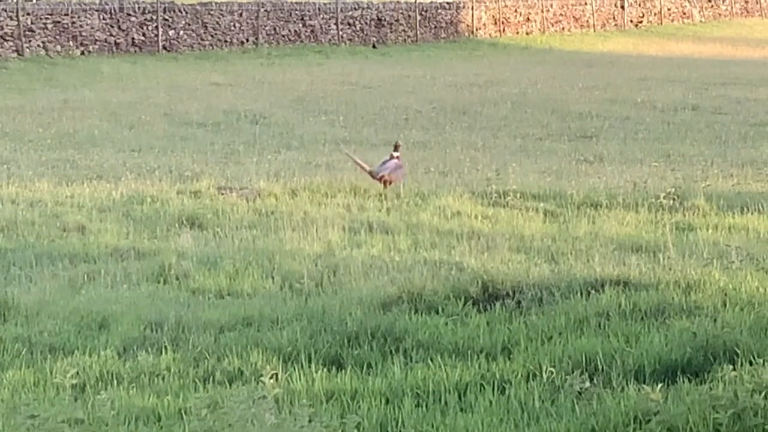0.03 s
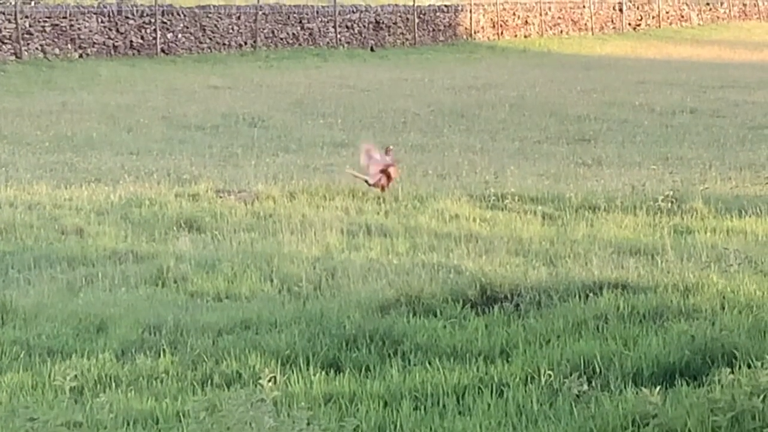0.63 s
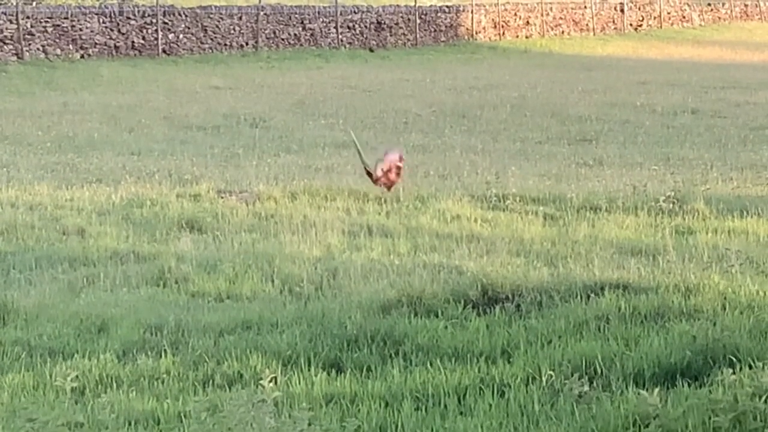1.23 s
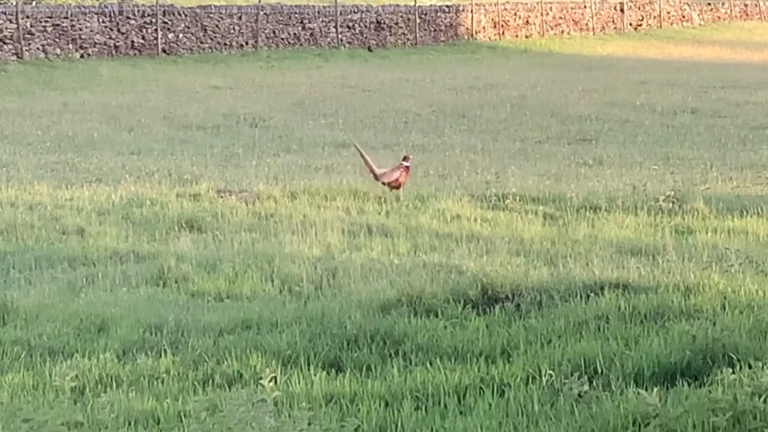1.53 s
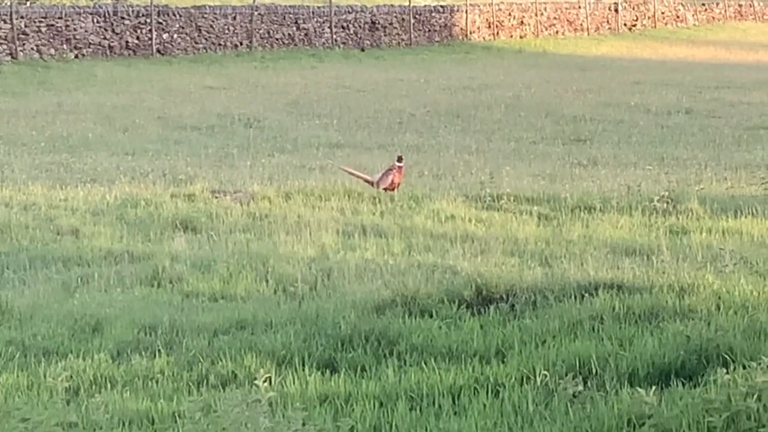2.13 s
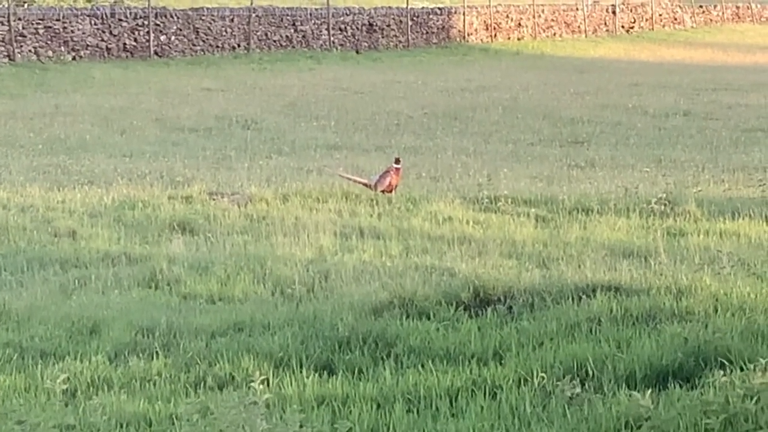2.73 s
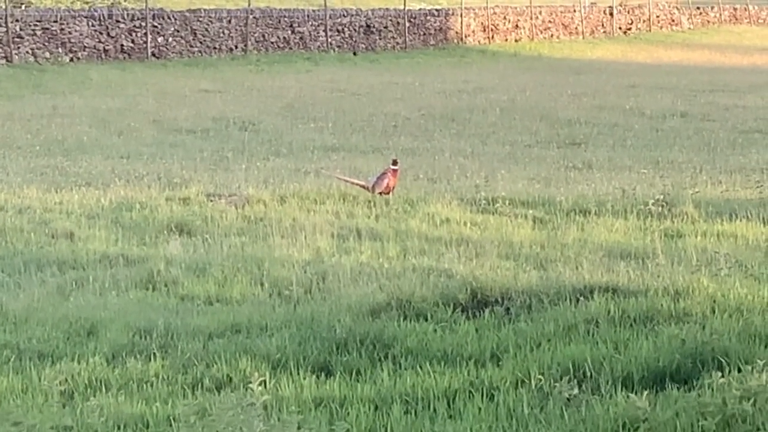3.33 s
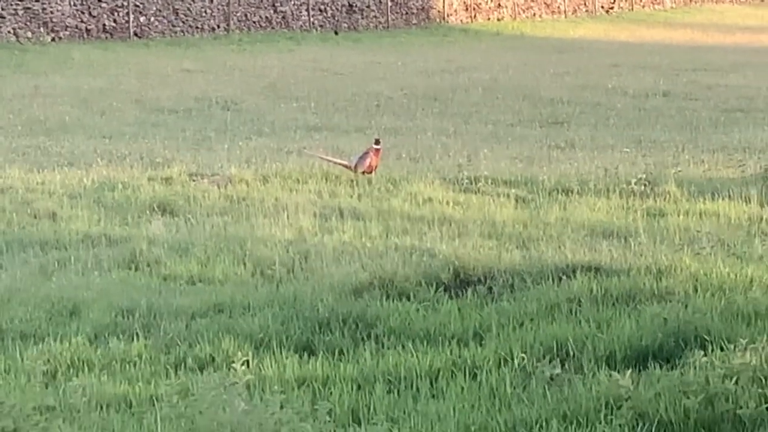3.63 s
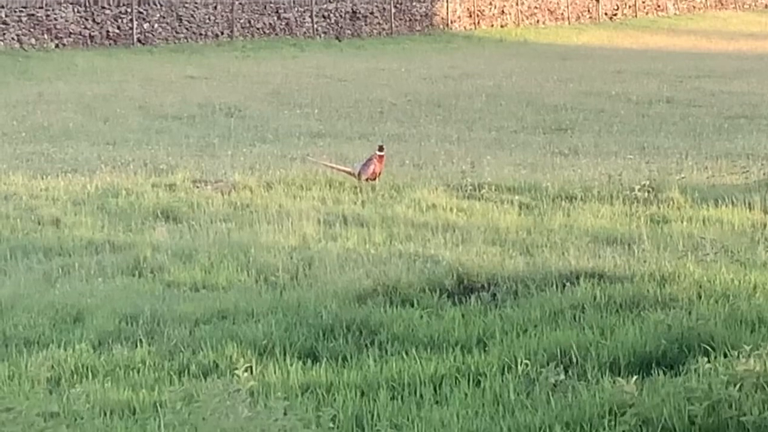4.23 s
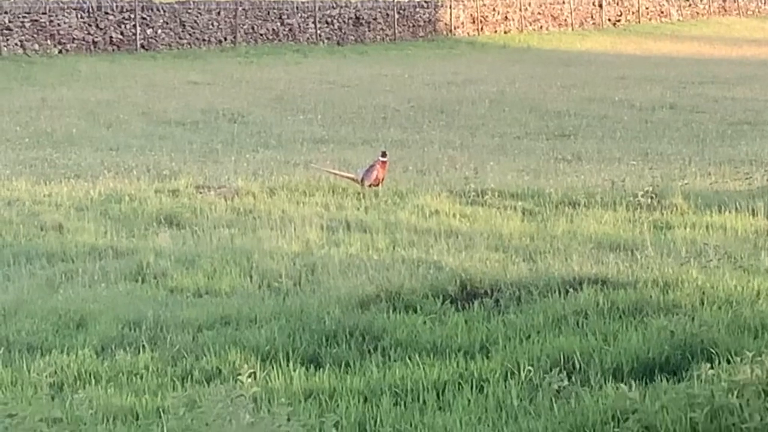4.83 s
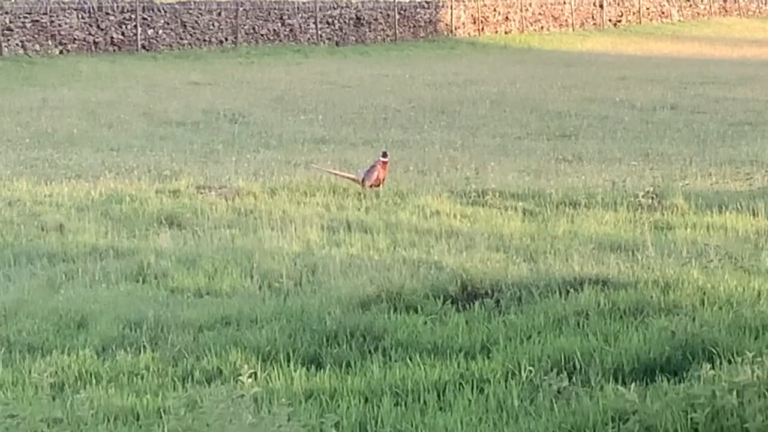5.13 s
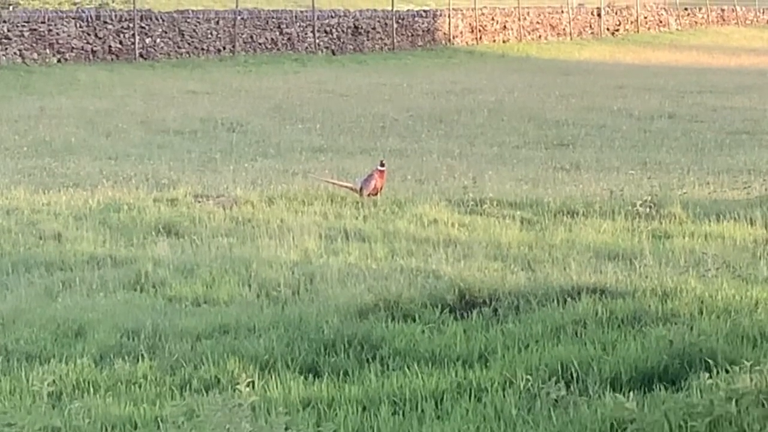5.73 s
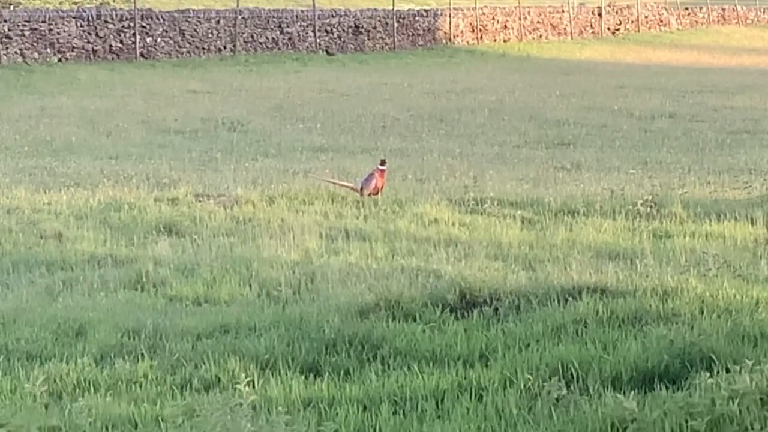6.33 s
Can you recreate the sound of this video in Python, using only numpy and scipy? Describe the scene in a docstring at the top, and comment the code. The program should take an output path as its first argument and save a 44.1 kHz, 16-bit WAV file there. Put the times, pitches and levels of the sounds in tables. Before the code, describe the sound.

In a quiet meadow, a cock pheasant gives a harsh, piercing two-note crow, then briefly whirrs its wings. A nearby chaffinch starts at the same time and whistles one phrase that outlasts the wings. Thin-voiced songbirds answer farther off, with a soft low rustle and one sharp tick close by. The calls echo slightly, and light wind bumps the microphone throughout.

```python
"""Light wind bumps the microphone over a faint country hush. Right away a cock pheasant in a walled
meadow gives his harsh two-note crow, two piercing tones over a throaty rasp, then whirrs his wings.
A chaffinch, starting with him, whistles one phrase that outlasts the whirr. Before it ends, thin-voiced
songbirds begin to answer farther off; while they sing come a low rustle and then one sharp tick.
Wall and trees scatter all the calls back."""
import sys
import numpy as np
from scipy import signal
from scipy.fft import rfft, irfft
from scipy.io import wavfile
from scipy.ndimage import uniform_filter1d

SR = 44100
rng = np.random.default_rng(int(sys.argv[2]) if len(sys.argv) > 2 else 0)


def waveform_to_disk(signal):
    """Save audio, clipped to [-1, 1], as 16-bit WAV at the path in sys.argv[1]."""
    frames = np.transpose(np.atleast_2d(signal))
    scaled = np.clip(frames, -1, 1) * 32767
    samples = np.round(scaled).astype(np.int16)
    wavfile.write(sys.argv[1], SR, samples)


N = 286650
TIME = np.arange(N) / SR


def from_db(db):
    """Turn decibels into a number to multiply by."""
    return 10 ** (np.asarray(db) / 20)


def rms_one(x):
    """Scale a signal to an average strength (rms) of 1."""
    return x / np.sqrt(np.mean(x ** 2) + 1e-20)


def during(t, length, attack, release):
    """Fade in, hold and fade out, starting at t = 0."""
    return np.clip(np.minimum(t / attack, (length - t) / release), 0, 1)


def swell(at_s, half_s):
    """A smooth rise and fall of height 1 around a moment."""
    return np.exp(-((TIME - at_s) / half_s) ** 2)


def drift(rate, size=N):
    """A smooth random wobble of strength 1 that changes about rate times a second."""
    smoothing = 1 + (np.fft.rfftfreq(size, 1 / SR) / rate) ** 2
    return rms_one(irfft(rfft(rng.standard_normal(size)) / smoothing, size))


def noise(colour):
    """Noise of strength 1; its colour says how strong the low and high parts are."""
    hz, db = np.transpose(colour)
    gain = from_db(np.interp(np.log(np.fft.rfftfreq(N, 1 / SR) + 1), np.log(hz), db))
    return rms_one(irfft(rfft(rng.standard_normal(N)) * gain, N))


def tone(hz):
    """A pure tone of strength 1 that follows a changing pitch."""
    return np.sqrt(2) * np.sin(2 * np.pi * np.cumsum(hz) / SR)


def resonate(x, hz, width_hz):
    """Let a sound ring around one pitch; filtering twice shuts out more of the rest."""
    r = np.exp(-np.pi * width_hz * np.sqrt(2) / SR)
    section = [(1 - r * r) / 2, 0, -(1 - r * r) / 2, 1, -2 * r * np.cos(2 * np.pi * hz / SR), r * r]
    return signal.sosfilt([section, section], x + 1e-18)


def meadow(x, clear_hz, scatter_db, scatter_s, tail_db, tail_s, dull_hz):
    """The direct sound, quick echoes off ground and branches, and a duller tail off wall and trees."""
    t = TIME[:SR]
    direct = signal.sosfilt(signal.butter(2, clear_hz, fs=SR, output="sos"), x)   # leaves scatter highs
    scatter, tail = rng.standard_normal((2, SR))
    scatter = scatter * np.exp(-(t / scatter_s) ** 2)
    tail = signal.sosfilt(signal.butter(2, dull_hz, fs=SR, output="sos"), tail)
    tail = tail * from_db(-60 * t / tail_s) * (1 - np.exp(-t / 0.011))
    echo = (from_db(scatter_db) * rms_one(scatter) + from_db(tail_db) * rms_one(tail)) / np.sqrt(SR)
    heard = direct + signal.fftconvolve(x, echo)[:N]
    return rms_one(heard) * np.std(x)   # echoes spread the energy out without adding any


# the colour of the hush: f/Hz, relative level/dB
HUSH_COLOUR = [(24, -47), (40, -2), (91, -5), (146, -6.5), (247, -11), (350, -13), (472, -15.5), (926, -19),
               (998, -21), (2110, -34.5), (2570, -31.5), (2920, -36), (5170, -29.5), (7710, -39),
               (15500, -43.5)]
def country_hush(level_db=-55.5):
    """A faint, steady noise behind everything."""
    return from_db(level_db) * noise(HUSH_COLOUR)


# the colour of the wind's rumble: f/Hz, relative level/dB
RUMBLE_COLOUR = [(25, -30), (45, -11), (65, 8), (100, 0.5), (160, -6.5), (250, -16.5), (400, -28.5),
                 (800, -47), (3000, -66)]
# how the breeze rises and falls: t/s, relative level/dB
BREEZE_LEVELS = [(0.0, -53), (0.76, -50), (1.19, -50), (1.52, -59), (2.35, -54), (3.06, -61.5), (3.56, -50),
                 (4.2, -62), (4.98, -53), (5.49, -57), (5.63, -50.5), (6.5, -53)]
# small swirls of air that hit the microphone: t/s, half length/s, level/dB
SWIRLS = [(.005, 0.05, -45.5), (0.346, 0.037, -43), (0.63, 0.017, -50), (1.101, 0.013, -38.5),
          (1.23, 0.049, -55), (1.318, 0.01, -42), (1.56, .01, -51), (1.749, 0.019, -46.5),
          (2.066, 0.035, -47.5), (2.477, 0.036, -41), (2.595, 0.0083, -39.5), (2.713, 0.0079, -45.5),
          (3.091, 0.01, -43), (3.38, 0.039, -52.5), (3.502, 0.053, -52.5), (3.567, 0.021, -39),
          (3.942, 0.0066, -44), (4.877, 0.012, -44), (5.01, 0.042, -50.5), (5.223, 0.03, -38),
          (5.627, 0.17, -56.5), (5.878, 0.019, -42), (6.176, 0.014, -42.5), (6.435, 0.0069, -41.5)]
def wind(breeze_gain_db=-3.5, swing_db=2.5):
    """Moving air rumbles on the microphone, and single swirls give it short bumps."""
    rumble = noise(RUMBLE_COLOUR)
    power = uniform_filter1d(uniform_filter1d(rumble ** 2, size=SR // 40), size=SR // 60)
    rumble /= np.sqrt(power + 1e-9)   # even it out, so breeze and swirls set the loudness
    breeze_db = np.interp(TIME, *np.transpose(BREEZE_LEVELS)) + swing_db * drift(13)
    bumps = sum(from_db(db) * swell(s, half_s) for s, half_s, db in SWIRLS)
    return (from_db(breeze_db + breeze_gain_db) + bumps) * rumble


# the two touches of the rustle: t/s, half length/s, level/dB
TOUCHES = [(3.518, 0.015, -46), (3.54, 0.0035, -45)]
# their colour: f/Hz, relative level/dB
TOUCH_COLOUR = [(200, 9.5), (500, 3), (1000, -3.5), (2100, -14.5), (3500, -53), (16000, -57)]
def rustle():
    """Two quick puffs of low noise, close by."""
    touches = sum(from_db(db) * swell(s, half_s) for s, half_s, db in TOUCHES)
    return touches * noise(TOUCH_COLOUR)


def tick(at_s=4.2807, level_db=-42, top_hz=5065, fall_s=0.001, length_s=0.015):
    """One sharp tick close by: a tone that dives, fast at first and then slower."""
    t = np.maximum(TIME - at_s, 0)
    hz = top_hz / (1 + t / fall_s) ** 1.35
    return from_db(level_db) * during(t, length_s, attack=0.0012, release=length_s / 2) ** 2 * tone(hz)


# syllables, the small pieces of a song, each made of one or more slides in pitch:
# length/s, start f/Hz, middle f/Hz, end f/Hz, relative level/dB, loudest point/0-1, trill depth/Hz
SLIDES = { "buzz": [(.029, 4185, 4970, 4430, -1, 0, 296), (.074, 3680, 3610, 3500, 0, 0.15, 360)],
          "swoop": [(.054, 4800, 5200, 4000, -7.5, 0.04, 350), (0.024, 4400, 3900, 2900, -1, 0.64, 95)],
          "chip": [(.018, 3330, 4054, 3800, -5, 0.9, 243), (.022, 3360, 2630, 2330, -3, 0.05, 170)],
          "pip": [(.02, 3420, 3280, 3120, 4.5, 0.16, 0)],
          "slur": [(.017, 3270, 4180, 4390, -4.5, 0.76, 250), (.02, 3410, 3143, 2830, -1.5, .7, 383),
          (.058, 2830, 2393, 1686, -6, 0, 90)], "tick": [(.024, 6600, 5580, 5270, -5, 0.96, 385)],
          "flourish": [(0.021, 1830, 2800, 2400, -7, 0.9, 14), (.012, 3160, 3900, 3410, 5.5, 0.8, 100),
          (.185, 3450, 4100, 2800, -.5, 0.19, 520), (0.065, 3300, 2600, 2000, -4.5, 0, 337)],
          "peep": [(.06, 3710, 3644, 3720, -1.5, 0.53, 0)],
          "flute": [(.065, 2407, 2700, 2500, 0.5, 0.15, 158)],
          "low flute": [(.07, 2410, 2230, 2150, -6.5, 0.6, 0)],
          "tew": [(.06, 4650, 4210, 4100, -3, 0.85, 260)], "lisp": [(.085, 5960, 5460, 5120, -4, .35, 300)],
          "see": [(.017, 5750, 6460, 7300, -9.5, 0.2, 0.0089), (.125, 7047, 7010, 6810, -7, 0, 0)],
          "drop": [(.045, 5510, 4800, 4290, -2, 0.18, 260)],
          "whistle": [(.145, 5120, 4875, 4705, 3.5, 0.08, 0)],
          "flick": [(.014, 5630, 6930, 7300, -7, 0.6, 0), (.05, 7440, 7530, 7480, -13.5, 0, 0)],
          "rise": [(.088, 3750, 4640, 5440, -5.5, 0.4, 130)],
          "sigh": [(.175, 7890, 7750, 6830, -7.5, 0.07, 110)],
          "fall": [(.095, 5400, 4280, 3346, 3, 0, 280)], "sip": [(.115, 6800, 6100, 5900, -3, 0.26, 120)]}
def syllable(name, t):
    """Pitch, loudness and trill depth of a syllable: each slide bends in an arc, swells and fades."""
    hz, gain, depth = np.zeros((3, len(t)))
    begin_s = 0
    for length_s, start_hz, middle_hz, end_hz, db, loudest, trill_depth_hz in SLIDES[name]:
        now = t >= begin_s
        along = np.minimum((t[now] - begin_s) / length_s, 1)
        bend_hz = 2 * (2 * middle_hz - start_hz - end_hz) * along * (1 - along)
        hz[now] = start_hz + (end_hz - start_hz) * along + bend_hz
        peak = np.clip(loudest, 0.02, 0.98)
        gain[now] = from_db(db) * during(along, 0.98, peak, 1 - peak) ** 0.46   # a rounded swell
        depth[now] = trill_depth_hz
        begin_s += length_s
    return hz, gain, depth


def sing(song, trill_hz, waver, flutter_db):
    """Whistle each syllable, never twice alike; a trill shakes the pitch quickly up and down."""
    out, t = np.zeros(N + SR), TIME[:SR // 3]
    for start_s, level_db, name in song:
        hz, gain, depth_hz = syllable(name, t)
        trill = tone(trill_hz * (1 + 0.077 * drift(31, len(t)))) / np.sqrt(2)
        pitch = hz * (1 + waver * drift(86, len(t))) + depth_hz * trill
        loudness = gain * from_db(level_db + flutter_db * drift(74, len(t)))
        at = round(start_s * SR)
        out[at:at + len(t)] += loudness * tone(pitch)
    return out[:N]


# what the far birds sing: t/s, relative level/dB, syllable
FAR_SONG = [(1.72, -67, "peep"), (2.04, -56.5, "peep"), (2.275, -66.5, "pip"), (2.61, -69.5, "low flute"),
            (2.7, -73, "flute"), (2.84, -74, "flute"), (2.99, -72.5, "flute"), (3.03, -65, "tew"),
            (3.13, -70, "low flute"), (3.16, -66.5, "tew"), (3.265, -57.5, "lisp"), (3.34, -78, "flute"),
            (3.424, -54.5, "see"), (3.593, -59.5, "drop"), (3.664, -54, "see"), (3.827, -56, "drop"),
            (3.899, -57, "see"), (4.06, -56, "drop"), (4.134, -55.5, "see"), (4.364, -56.5, "whistle"),
            (5.132, -52.5, "flick"), (5.223, -56.5, "drop"), (5.3, -51.5, "rise"), (5.452, -52, "rise"),
            (5.55, -58.5, "sigh"), (5.807, -61.5, "fall"), (5.98, -62, "fall"), (6.154, -63, "fall"),
            (6.327, -57, "sip")]
def far_songbirds():
    """Thin whistles from farther off, heard more as echo than directly."""
    song = from_db(2.5) * sing(FAR_SONG, trill_hz=117.9, waver=0.0086, flutter_db=2)
    return meadow(song, clear_hz=9300, scatter_db=4, scatter_s=0.086,
                  tail_db=-6.5, tail_s=0.6, dull_hz=8000)


# what the chaffinch sings: t/s, relative level/dB, syllable
FINCH_SONG = [(.015, -53, "buzz"), (.2, -49, "buzz"), (.383, -49, "buzz"), (.748, -45, "buzz"),
              (.888, -55, "tick"), (.929, -45, "buzz"), (1.069, -44.5, "swoop"), (1.196, -43.5, "swoop"),
              (1.32, -49, "chip"), (1.383, -44.5, "chip"), (1.452, -46, "chip"), (1.523, -47, "chip"),
              (1.592, -46.5, "chip"), (1.668, -47, "pip"), (1.675, -45.5, "slur"), (1.814, -53, "pip"),
              (1.838, -48, "slur"), (1.982, -54, "pip"), (2.005, -47, "slur"), (2.162, -43.5, "tick"),
              (2.218, -51, "tick"), (2.326, -49.5, "flourish")]
def chaffinch():
    """A nearby bird whistles a run of buzzes and chips that ends in a flourish."""
    song = from_db(-0.5) * sing(FINCH_SONG, trill_hz=153.6, waver=0.0193, flutter_db=1.5)
    return meadow(song, clear_hz=4000, scatter_db=-5, scatter_s=0.031,
                  tail_db=-15, tail_s=0.77, dull_hz=8500)


# the colour of swishing feathers: f/Hz, relative level/dB
FEATHER_COLOUR = [(100, -39), (300, 9.5), (800, 3), (1700, 2), (2600, -12), (6000, -14.5), (12000, -19),
                  (16000, -30)]
def wings(start_s=0.805, gap_s=0.0366, count=13, level_db=-60, spread_db=5):
    """Each wingbeat is a short swish of feathers; the beats quicken into a whirr."""
    beat = np.arange(count)
    times = start_s + gap_s * (beat + np.minimum(beat, 2))   # the first two gaps are twice as long
    strokes = sum(from_db(level_db + spread_db * rng.standard_normal()) * swell(s, half_s=0.014)
                  for s in times)
    return strokes * noise(FEATHER_COLOUR)


# the pitches at which throat and beak ring: f/Hz, width/Hz, relative level/dB
THROAT_RINGS = [(790, 47, 2.5), (1020, 98, 1), (1450, 250, -12), (1880, 215, -6), (2810, 290, -17),
                (3893, 330, -1.5), (4070, 86, -14), (4700, 630, -1), (5330, 85, -0.5), (5376, 170, -10),
                (6970, 160, -13), (8330, 600, -19), (9300, 2100, -39), (11000, 1400, -25),
                (14700, 2200, -43)]
def throat_rasp(pulse_hz=270, jitter=0.25, air=0.99):
    """Uneven pulses and puffs of air make the pheasant's throat ring."""
    cycles = np.cumsum(pulse_hz * (1 + jitter * drift(150))) / SR
    pulses = np.diff(np.floor(cycles), prepend=0) * from_db(2 * rng.standard_normal(N))
    puffs = rng.standard_normal(N) * np.exp(-2 * (cycles % 1))   # air escapes with each pulse
    source = rms_one(pulses) + air * rms_one(puffs)
    return rms_one(sum((-1) ** k * from_db(db) * resonate(source, hz, width_hz)
                       for k, (hz, width_hz, db) in enumerate(THROAT_RINGS)))


# the two notes of the crow: t/s, length/s, relative level/dB
CROW_NOTES = [(.055, 0.23, -8), (0.542, 0.088, -7)]
# moments when the bird pushes harder: t/s, half length/s, extra level/dB
PUSHES = [(0.12, .026, 6.5), (0.215, 0.0279, 9.5), (0.584, 0.023, 6.5)]
def pheasant(low_tone_hz=1071, high_tone_hz=3970, flutter_db=2, scoop_hz=279.4, scoop_s=0.00805,
             beak_open_s=0.044, closed_beak_hz=5000):
    """Two piercing tones ride on the rasp; pushing harder makes them higher and louder."""
    rasp = throat_rasp()
    muffled = signal.sosfiltfilt(signal.butter(3, closed_beak_hz, fs=SR, output="sos"), rasp)
    effort_db = sum(db * swell(s, half_s) for s, half_s, db in PUSHES)
    low_hz = low_tone_hz + 3.5 * effort_db + 14 * drift(97)
    high_hz = high_tone_hz + 10.5 * effort_db + 40 * drift(110)
    low_gain = from_db(-31.5 + 0.6 * effort_db + flutter_db * drift(100))
    high_gain = from_db(-30.5 + effort_db + flutter_db * drift(90))
    rasp_gain = from_db(-27.5 + 0.15 * effort_db)
    crow = np.zeros(N)
    for start_s, length_s, level_db in CROW_NOTES:
        t = np.maximum(TIME - start_s, 0)
        scoop = scoop_hz * np.exp(-t / scoop_s)   # both tones slide up into the note
        opening = np.clip(t / beak_open_s, 0, 1)   # the opening beak lets the high sounds out
        upper = tone(high_hz - scoop) + from_db(-30) * tone(2 * (high_hz - scoop))
        tones = low_gain * tone(low_hz - scoop) + np.sqrt(opening) * high_gain * upper
        harsh = rasp_gain * (muffled + opening ** 2 * (rasp - muffled))
        pressure = during(t, length_s, attack=0.015, release=0.051)
        crow += pressure * from_db(level_db) * (pressure * tones + harsh)   # tones need more pressure
    return meadow(crow, clear_hz=13500, scatter_db=-2, scatter_s=0.047,
                  tail_db=-12.5, tail_s=0.55, dull_hz=8000)


def scene():
    """Add all the sounds together in one channel."""
    calls = pheasant() + chaffinch() + far_songbirds()
    return (calls + country_hush() + wings() + rustle() + tick() + wind())[None]


def record(dry):
    """Cut away the deepest rumble and the very highest hiss."""
    thin = signal.sosfilt(signal.butter(6, 39, "high", fs=SR, output="sos"), dry)
    return signal.sosfilt(signal.ellip(12, 0.1, 80, 15750, fs=SR, output="sos"), thin)


dry = scene()
out = record(dry)
waveform_to_disk(out)
```